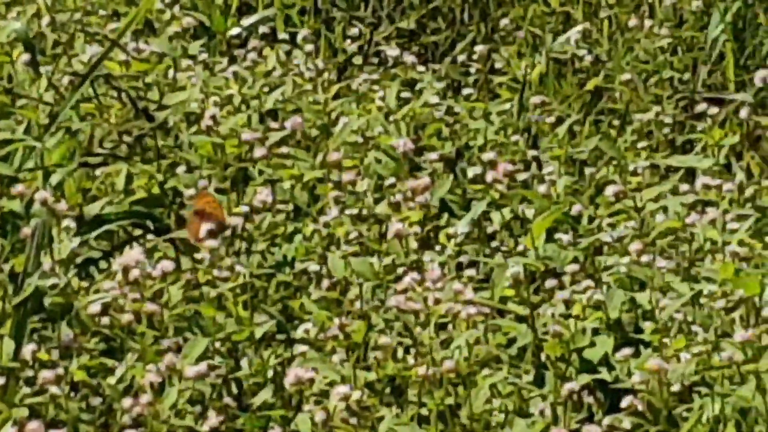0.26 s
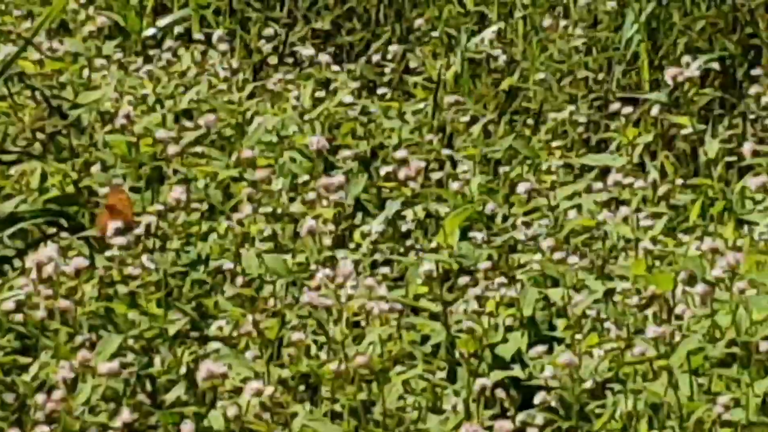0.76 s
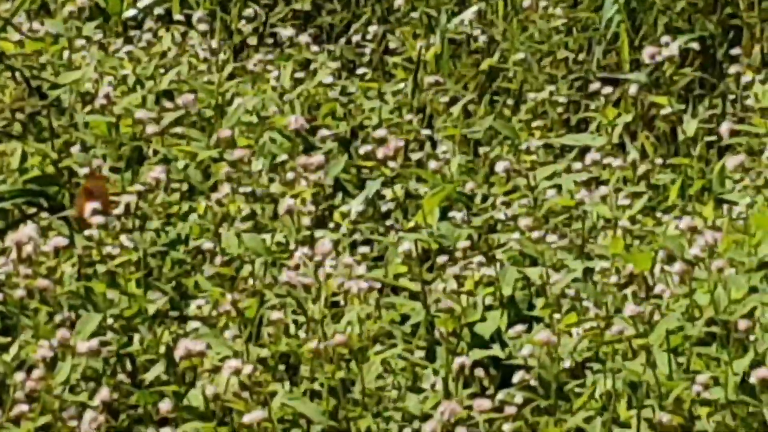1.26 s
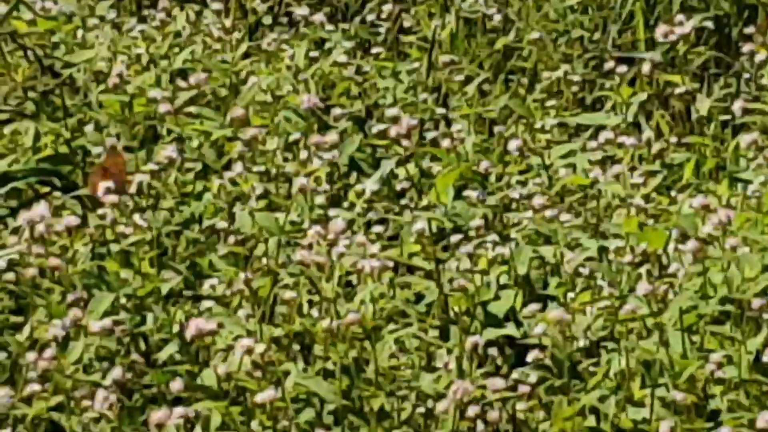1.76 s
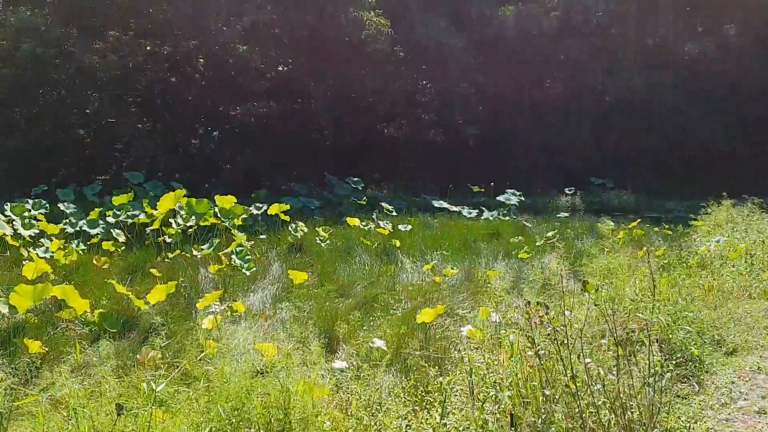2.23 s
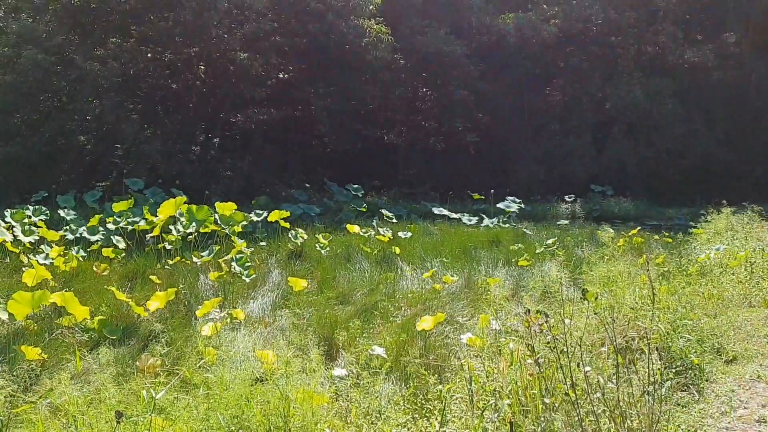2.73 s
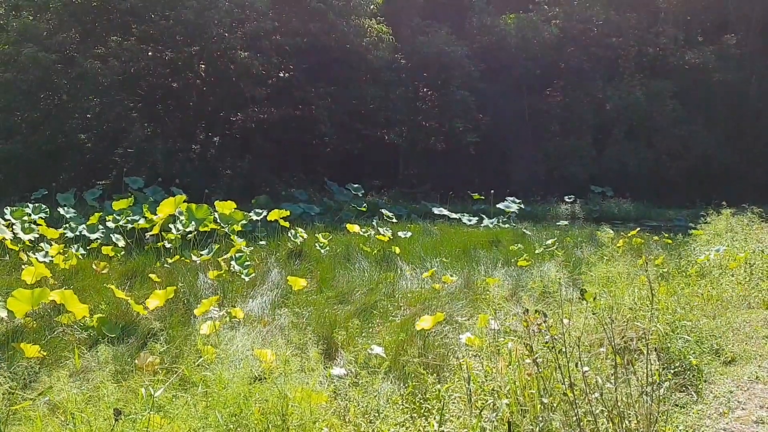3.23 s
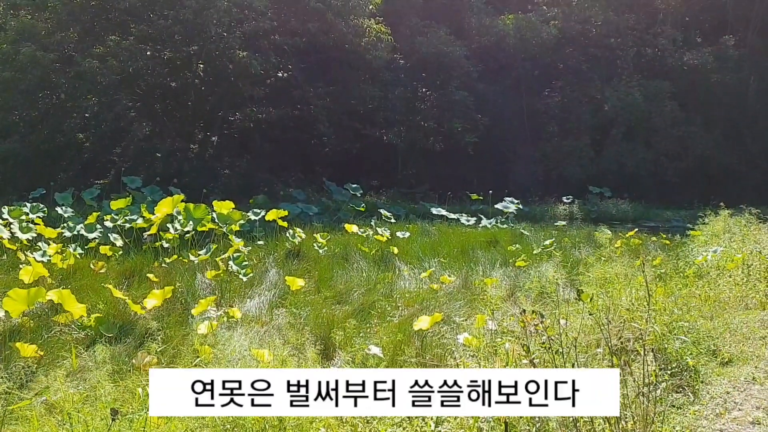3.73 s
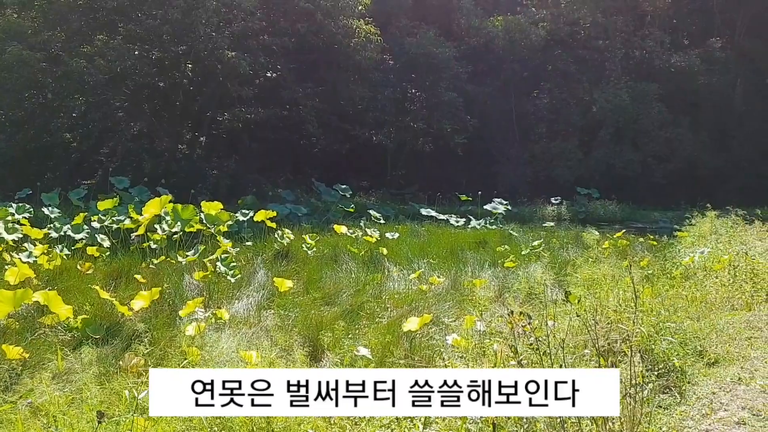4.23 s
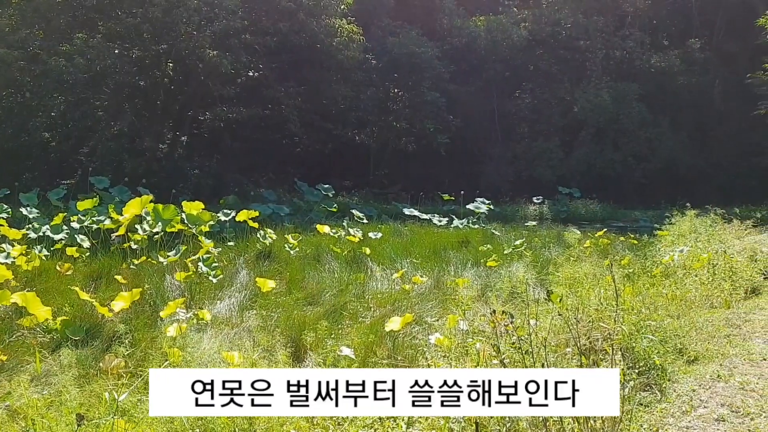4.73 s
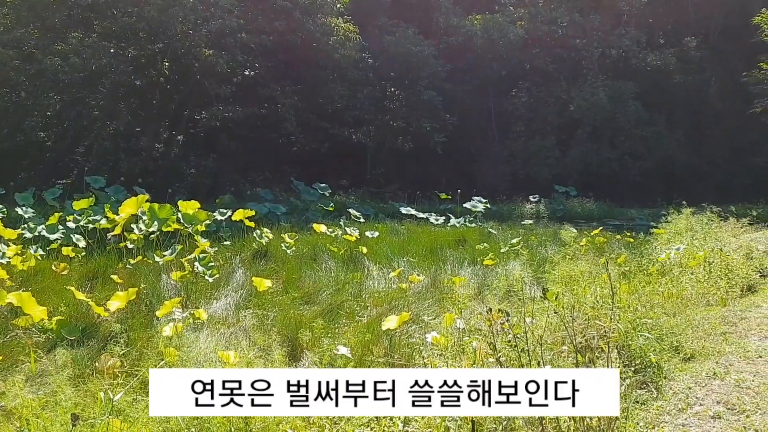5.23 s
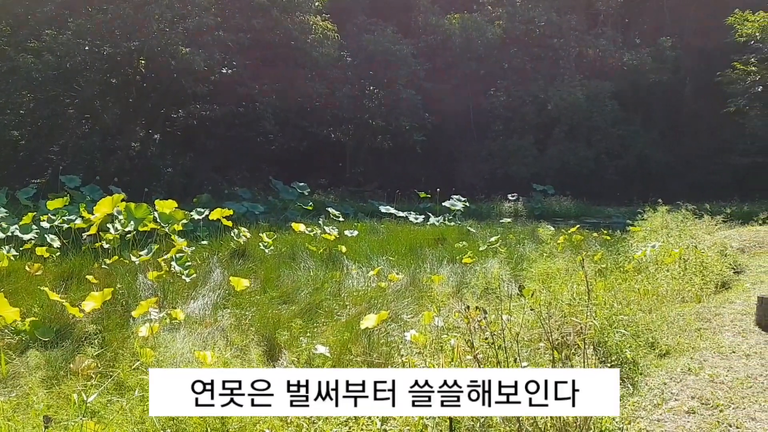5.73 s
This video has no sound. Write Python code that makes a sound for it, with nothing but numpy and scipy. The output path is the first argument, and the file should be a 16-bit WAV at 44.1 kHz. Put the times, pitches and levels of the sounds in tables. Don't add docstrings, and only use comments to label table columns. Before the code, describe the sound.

Outdoor stereo insect ambience, with no handling sounds or water. From 0 to 0.3 s a near cicada's crisp high buzz is already sounding; a nasal whine around 4 kHz swells to about 0.5 s, the buzz returns until 0.9, a second whine lasts to 1.1, and a last rougher buzz runs to 1.5. It then sinks into a grainy, uneven drone, surging at 1.55 and again at 2.2 before fading by 2.7, with a slight echo from plants. At about 2.77 s the background switches abruptly: a steady, shimmering choir of pond cicadas, strongly left, holds to the end at 6 s, dipping near 5.7 and rising last. Throughout, a katydid gives tiny dry chirps of several strokes at 12-14 kHz, roughly every 0.23 s; a quicker, quieter one interleaves, left then right. Broad far-insect hiss and light, lumpy wind rumble, with gusts near 0.1, 1.1, 3.2, and 4.1 s.

```python
import sys
import numpy as np
from scipy import signal
from scipy.fft import rfft, irfft
from scipy.io import wavfile
from scipy.ndimage import uniform_filter1d

SR = 44100
rng = np.random.default_rng(int(sys.argv[2]) if len(sys.argv) > 2 else 0)


def linear_from_db(decibels):
    return 10 ** (np.asarray(decibels, float) / 20)


def store_pcm(level_fs):
    pcm = np.round(np.clip(level_fs, -1, 1) * 32767).astype(np.int16)
    wavfile.write(sys.argv[1], SR, np.atleast_2d(pcm).T)


N = 263718
CUT_S = 2.768

# (start [s], release [s], top level [dB], roughness [0-1])
BUZZ = [
    (-.2, 0.27, -44, .12),
    (.5, 0.923, -45, 0.4),
    (1.127, 1.505, -45.5, 0.6),
]
# (at start [Hz], at end [Hz])
BUZZ_HZ = [
    (168.2, 168.8),
    (167.5, 167.8),
    (167.8, 163.8),
]
# (frequency [Hz], level [dB])
BUZZ_COLOUR = [(5880, -48), (10000, -13), (11000, -18.5), (11500, -7), (13100, -1.5), (15100, -2),
               (15800, -7), (16000, -11)]
BUZZ_PANS_DB = (0, 2.5, 1.5)
BUZZ_RISE_S, BUZZ_START_DB, BUZZ_SWELL_S, BUZZ_SWELL_DB = 0.045, -12, 0.11, -2
BUZZ_DROP_S, BUZZ_DROP_DB, BUZZ_END_S, BUZZ_END_DB = 0.058, -7.5, 0.086, -11

# (start [s], air sac opens [s], release [s], top level [dB], sac resonance at release [Hz])
WHINE = [
    (0.235, 0.329, 0.5, -42.5, 4560),
    (0.856, 0.948, 1.124, -43, 4330),
]
# (frequency [Hz], level [dB])
OVERTONES = [
    [(3263, -66), (3607, -63), (3435, -54), (3779, -50), (3957, -58), (4124, -52), (4301, -54), (4468, -53),
     (4640, -54), (4813, -53), (4990, -54), (5157, -56), (5496, -60), (5674, -63), (6013, -59), (6191, -55),
     (6358, -60), (6535, -58)],
    [(3086, -65), (3257, -64), (3600, -64), (3429, -53), (5150, -56), (3768, -48), (3941, -61), (4118, -53),
     (4285, -55), (4457, -51), (4630, -53), (4797, -55), (4980, -53), (5486, -61), (5825, -60), (6169, -60),
     (6514, -55), (6686, -62)],
]
# (time [s], level [dB])
MURMUR = [
    (0, -63),
    (.06, -55),
    (.12, -61),
]
MURMUR_HZ, MURMUR_ROUGH = 172, 0.5
LEAD_DB, READY_DB, OPENED_DB, SINK_DB, RELEASE_DB = -14.5, -6.5, -3, -1.5, -3
OPEN_S, SINK_S, CREST_S = 0.03, 0.135, 0.05
DROP_S, DROP_DB, TAIL_S, TAIL_DB = 0.039, -8, 0.14, -18
SHUT_HZ, HELD_HZ, SLACK_HZ, EMPTY_HZ = 5040, 4430, 3800, 3400
SHUT_DB, OPEN_DB, EMPTY_DB = -8, 0, -1.5
TOP_HZ, SAG_HZ_PER_DB, TIRE_HZ = 171.9, 0.2, 1.0
CLEAN, ROUGH_PER_DB, WHINE_PAN_DB, SLACK_PAN_DB = 0.05, 0.007, 2.4, 6

# (time [s], effort [dB], rib clicks [Hz], sac resonance [Hz], sac strength [dB])
DRONE = [
    [(1.505, -60, 165, 4500, -8), (1.535, -47.5, 166, 4450, -8), (1.6, -45.5, 163.5, 4570, -3),
     (1.695, -46.3, 162.5, 4535, -2), (1.775, -49, 154, 4310, 0), (1.8, -51.5, 164.5, 4450, -1),
     (1.84, -50, 164, 4430, 0), (1.885, -49.5, 161, 4350, 0), (1.93, -53, 162, 4370, -3),
     (1.98, -51.5, 163, 4400, -2), (2.05, -51, 160, 4320, -1), (2.09, -52.5, 161, 4350, -2),
     (2.13, -50.5, 163.5, 4410, 0)],
    [(2.16, -51, 165, 4480, -5), (2.195, -46, 170.5, 4640, -11), (2.25, -46.5, 170, 4430, -12),
     (2.31, -47.5, 169.4, 4420, -11), (2.35, -52, 168.3, 4380, 0), (2.41, -53, 173, 4420, -2),
     (2.455, -50.5, 174, 4720, 0), (2.54, -53, 174, 4660, -3), (2.62, -57, 176, 4420, 0),
     (2.76, -57, 176, 4420, 0)],
]
# (frequency [Hz], width [Hz], level [dB])
SIDE_MODES = [(3170, 120, -23), (6240, 360, -16)]
# (frequency [Hz], width [Hz])
RIBS = [(3690, 260), (3940, 180), (5040, 270), (3300, 650)]
RIBS_DB = (-11, -11, -11, -14)
RIBS_FOLLOW = (-.3, .45, 1.9, 0)
# (rib number, time [s], half length [s], lift [dB])
OUTBURSTS = [
    (0, 1.55, .05, 7),
    (3, 1.54, .035, 7),
    (0, 1.755, .03, 5),
    (3, 1.75, .03, 5),
    (0, 1.93, .04, 4),
    (0, 2.02, .05, 8),
    (1, 2.16, .03, 10),
    (0, 2.18, .025, 5),
    (1, 2.48, .07, 15),
]
SAC_WIDTH_HZ, REST_DB, DRONE_PAN_DB = 200, -49, 3
DRONE_ROUGH, FIRST_ROUGH, FIRST_RIB_S = 0.5, 0.45, 0.035
ECHO_DB, ECHO_T60_S = -13, 0.3

# (time [s], level [dB])
CHOIR = [
    (2.77, -41.5),
    (3.5, -43),
    (4.3, -43),
    (5.1, -43.5),
    (5.45, -42.5),
    (5.72, -45),
    (5.98, -40),
]
# (frequency [Hz], width [Hz], level [dB])
SINGERS = [(3677, 48, -6), (3980, 27, -16), (4315, 28, -8.5), (4580, 45, -3), (4710, 31, -8),
           (4887, 80, -1), (5205, 50, -6.5), (5360, 55, -13), (5895, 80, -6), (6170, 105, -2.5),
           (6350, 87, -6.5), (6590, 48, -5.5), (7130, 130, -3.5), (7650, 720, -4)]

# (first full stroke [s], last stroke [s], level [dB])
NEAR = [(.062, .139, -46), (.292, .373, -44), (.54, .617, -50), (.75, .83, -44), (.979, 1.055, -43),
        (1.21, 1.29, -42.5), (1.44, 1.52, -46), (1.674, 1.768, -43.5), (1.907, 2.002, -44.5),
        (2.136, 2.214, -42.5), (2.356, 2.434, -43), (2.594, 2.689, -43), (2.84, 2.932, -43.5),
        (3.067, 3.16, -41.5), (3.29, 3.383, -42), (3.514, 3.609, -42.5), (3.737, 3.851, -42.5),
        (3.978, 4.092, -43.5), (4.223, 4.319, -40.5), (4.456, 4.554, -41.5), (4.697, 4.792, -41.5),
        (4.931, 5.024, -41.5), (5.174, 5.269, -40.5), (5.405, 5.501, -43), (5.623, 5.738, -42),
        (5.863, 5.958, -42.5)]
# (first full stroke [s], last stroke [s], level [dB])
QUICK = [(.405, .459, -49), (1.55, 1.603, -58), (1.757, 1.812, -50), (2.05, 2.117, -56), (2.265, 2.33, -53),
         (2.462, 2.524, -51.5), (2.677, 2.731, -51), (2.905, 2.96, -46.5), (3.125, 3.178, -54),
         (3.46, 3.53, -49.5), (3.63, 3.695, -50), (3.847, 3.914, -48), (4.058, 4.125, -46),
         (4.27, 4.335, -48), (4.474, 4.528, -49), (4.622, 4.69, -50.5), (4.821, 4.888, -49),
         (5.029, 5.096, -48.5), (5.24, 5.307, -50), (5.48, 5.547, -49), (5.7, 5.766, -49.5),
         (5.92, 5.975, -49)]
# (frequency [Hz], level [dB])
WING_MEADOW = [(5880, -17), (10000, -20), (10500, -19), (11600, -5), (12100, -10), (13000, 2), (13700, 1),
               (14500, -4), (15400, -13), (16000, -12)]
# (frequency [Hz], level [dB])
WING_POND = [(5290, -39), (9000, -17), (12200, -2), (13300, 5), (14100, 4), (15100, -5), (16000, -10)]
# (frequency [Hz], level [dB])
WING_TURNED = [(5290, -40), (9000, -20), (11500, -5.5), (12700, 5.5), (13300, 10), (14200, -4), (15200, -3),
               (16000, 2)]
HIDDEN_DB = -3

# (frequency [Hz], level [dB per Hz])
MEADOW = [(210, -21), (350, -13.5), (575, -11.5), (895, -3.5), (1100, -14), (1230, -9), (1450, -7),
          (1620, -10), (3420, -1), (3820, -2), (3980, 2), (6020, 0.5), (9500, -16), (12400, -60),
          (20900, -120)]
# (frequency [Hz], level [dB per Hz])
POND = [(210, -40), (350, -18), (488, -25.5), (623, -16), (832, -14), (1180, -21), (1420, -16.5),
        (2490, -16), (3200, -10), (3570, -7), (4760, -2.5), (5500, -6.5), (6090, -3.5), (8480, -15),
        (11000, -18), (14300, -28), (22000, -120)]
# (frequency [Hz], level [dB per Hz])
MEADOW_TOP = [(5290, -55), (9000, 1.5), (12000, 5), (12800, 3.5), (15000, 7), (16000, -12)]
# (frequency [Hz], level [dB per Hz])
POND_TOP = [(6180, -30), (10500, -12), (13900, -8.5), (14800, -14), (15000, -24), (15900, -28),
            (16000, -44)]
MEADOW_DB, POND_DB, MEADOW_TOP_DB, POND_TOP_DB = -50, -47, -56, -57.5
# (frequency [Hz], left over right [dB])
SIDE_DB = [(60, 2.0), (180, 7), (550, 4), (1650, 3), (4970, 3.5), (15000, 5)]

# (frequency [Hz], level [dB per Hz])
RUMBLE = [(8.8, -40), (15, -29), (49, 1.5), (95, -5), (120, -23), (210, -120)]
# (frequency [Hz], level [dB per Hz])
BODY = [(50, -38), (85, -4), (119, 4.5), (177, -5.5), (263, -2), (450, -22), (580, -46), (990, -120)]
# (time [s], strength [dB], depth [0 body - 1 rumble])
GUSTS = [(.09, 7.5, 0.97), (.39, 4, 0.7), (.88, 3.5, 0.96), (1.1, 6, 1), (1.21, 2.5, .4), (1.45, 5, 0.96),
         (1.62, 1.5, .3), (2.02, 4, 0.61), (2.3, 2, 0.79), (2.7, 4, 0.16), (2.98, 2, .05),
         (3.17, 7.5, 0.94), (4.0, 4, .1), (4.14, 11, 0.7), (4.65, 4, .2), (4.81, 5, .05), (5.38, 2.5, .05),
         (5.9, 4.5, 1)]
RUMBLE_CALM_DB, BODY_CALM_DB, GUST_S = -64, -61, 0.067
POND_RUMBLE_DB = -3


def cicada():
    out = np.zeros((2, N))
    for song in (buzz, whine, drone):
        song(out)
    t = np.arange(0, ECHO_T60_S, 1 / SR)
    echo = rng.standard_normal((2, len(t))) * linear_from_db(-60 * t / ECHO_T60_S) * (t > 0.004)
    wet = signal.fftconvolve(out, echo / np.linalg.norm(echo[0]), axes=1)[:, :N]
    return (out + linear_from_db(ECHO_DB) * wet) / np.sqrt(1 + linear_from_db(2 * ECHO_DB))


def buzz(out):
    def colour(k, hz):
        return linear_from_db(read(BUZZ_COLOUR, k * 169.6))

    for phrase, cycles_hz in zip(BUZZ, BUZZ_HZ):
        rows = buzz_rows(*phrase, *cycles_hz)
        add(out, *tymbal(rows, range(62, 95), colour, drift_s=0.11, spread=1.36, wander=1.6))


def buzz_rows(start, release, top_db, rough, start_hz, end_hz):
    risen = start + BUZZ_RISE_S
    s = np.array([start, risen, risen + BUZZ_SWELL_S, release, release + BUZZ_DROP_S, release + BUZZ_END_S])
    under = [BUZZ_START_DB, BUZZ_SWELL_DB, BUZZ_SWELL_DB / 2, 0, BUZZ_DROP_DB, BUZZ_END_DB]
    db = top_db + np.array(under)
    heard = np.maximum(s, 0)
    hz = np.interp(heard, heard[[0, -1]], [start_hz, end_hz])
    pan_db = np.interp(heard, heard[[0, 3, 5]], BUZZ_PANS_DB)
    return np.transpose([heard, np.interp(heard, s, db), hz, np.full(len(s), rough), pan_db])


def whine(out):
    murmur = [(s, db, MURMUR_HZ, MURMUR_ROUGH, WHINE_PAN_DB, HELD_HZ, SHUT_DB) for s, db in MURMUR]
    swells = [murmur] + [whine_rows(*swell) for swell in WHINE]
    for rows, lines in zip(swells, OVERTONES[:1] + OVERTONES):
        strength = {round(hz / 172): db for hz, db in sorted(lines, key=lambda line: line[1])}

        def colour(k, hz, sac_hz, body_db):
            near_sac = mode(hz, sac_hz, 400)
            above = np.clip((hz - sac_hz - 60) / 230, 0, 1) * (hz < 5300)
            under = mode(hz, 4600, 520) * np.clip((sac_hz - 4900) / 140, 0, 1)
            lift = 1.6 * body_db * (1 - near_sac) + 3 * near_sac
            return linear_from_db(strength[k] + lift - 15 * above - 13 * under - 5 * (hz > 5300))

        add(out, *tymbal(rows, strength, colour, drift_s=0.06, spread=1.0, wander=0.46, apart=0.35))


def whine_rows(start, opens, release, top_db, held_hz):
    s = np.array([start, opens - OPEN_S, opens, release - SINK_S, release - CREST_S,
                  release, release + DROP_S, release + TAIL_S])
    under = np.array([LEAD_DB, READY_DB, OPENED_DB, SINK_DB, 0, RELEASE_DB, DROP_DB, TAIL_DB])
    hz = TOP_HZ + SAG_HZ_PER_DB * under / 2 - TIRE_HZ * (s >= release)
    rough = CLEAN + ROUGH_PER_DB * under ** 2
    pan_db = np.where(under == DROP_DB, SLACK_PAN_DB, WHINE_PAN_DB)
    sac_hz = np.interp(s, s[[2, 3, 5, 6, 7]], [SHUT_HZ, SHUT_HZ - 100, held_hz, SLACK_HZ, EMPTY_HZ])
    body_db = [SHUT_DB] * 2 + [OPEN_DB] * 5 + [EMPTY_DB]
    return np.transpose([s, top_db + under, hz, rough, pan_db, sac_hz, body_db])


def drone(out):
    def colour(k, hz, sac_hz, sac_db, *ribs_db):
        body = linear_from_db(sac_db) * mode(hz, sac_hz, SAC_WIDTH_HZ)
        body = body + sum(linear_from_db(db) * mode(hz, f, width) for f, width, db in SIDE_MODES)
        ribs = sum(linear_from_db(1.97 * (db + 4.0)) * mode(hz, f, width) for (f, width), db in zip(RIBS, ribs_db))
        return body + ribs

    add(out, *tymbal(drone_rows(), range(18, 39), colour, drift_s=0.04, spread=0.91, wander=0.9, apart=0.6))


def drone_rows():
    s, db, hz, sac_hz, sac_db = np.transpose(sum(DRONE, []))
    effort = np.maximum(db - REST_DB, REST_DB / 10)
    first = np.exp(-((s - s[0]) / FIRST_RIB_S / 2) ** 2)
    ribs_db = np.array([rest_db + follow * effort for rest_db, follow in zip(RIBS_DB, RIBS_FOLLOW)])
    for rib, at_s, half_s, lift_db in OUTBURSTS:
        ribs_db[rib] += lift_db * np.exp(-((s - at_s) / half_s) ** 2)
    rough = DRONE_ROUGH + FIRST_ROUGH * first
    return np.transpose([s, db, hz, rough, DRONE_PAN_DB + 0 * s, sac_hz, sac_db, *ribs_db])


def tymbal(rows, orders, colour, drift_s, spread, wander, apart=1.0):
    s, *columns = np.transpose(rows)
    t = np.arange(s[0], s[-1], 1 / SR)
    samples = np.arange(len(t))
    db, hz, rough, pan_db, *controls = (np.interp(t, s, c) for c in columns)
    turns = np.cumsum(hz) / SR
    rough = np.clip(rough, 0, 1)
    knots = np.arange(len(t) // 128 + 2) * 128
    out = np.zeros((2, len(t)))
    for k in orders:
        z = rng.standard_normal((len(knots), 4, 2)) @ [1, 1j]
        start = np.exp(1j * spread * (rng.standard_normal() + apart * rng.standard_normal(2)))
        drift = evened(uniform_filter1d(z[:, :2], int(drift_s * SR / 128) + 1, axis=0))
        slow = start + wander * drift
        spin = colour(k, k * hz, *controls) * np.exp(2j * np.pi * k * turns)
        for ear in range(2):
            held = np.interp(samples, knots, slow[:, ear])
            fresh = np.interp(samples, knots, z[:, 2 + ear])
            out[ear] += ((np.sqrt(1 - rough) * held + np.sqrt(rough) * fresh) * spin).real
    power = uniform_filter1d((out ** 2).mean(0), size=1500)
    fade = np.clip(np.minimum(t - s[0] + (s[0] == 0), s[-1] - t) / 0.0038, 0, 1)
    return s[0], out / np.sqrt(power) * linear_from_db(db + 4) * panned(pan_db) * fade


def choir():
    s, db = np.transpose(CHOIR)
    t = np.arange(s[0], s[-1], 1 / SR)
    slow_t = t[::441]
    out, sound = np.zeros((2, N)), np.zeros((2, len(t)))
    for hz, width_hz, level_db in SINGERS:
        drifts = rng.standard_normal((2, len(slow_t)))
        waver, throb = (np.interp(t, slow_t, evened(uniform_filter1d(v, size=6))) for v in drifts)
        clicks = rng.standard_normal((2, len(t))) * (rng.random(len(t)) < 2500 / SR)
        turn = np.exp(2j * np.pi * np.cumsum(hz + 15 * waver) / SR)
        r = np.exp(-np.pi * width_hz / SR)
        ring = signal.lfilter([1], np.convolve([1, -r], [1, -r]), clicks / turn)
        sound += linear_from_db(level_db + 0.53 * throb) * evened((ring * turn).real)
    add(out, s[0], evened(sound) * linear_from_db(np.interp(t, s, db) - 6.5) * panned(13.9)[:, None])
    return out


def katydid(chirps, stroke_s, teeth_hz, pans_db, lag_s, echo_db):
    effort = wing_strokes(chirps, stroke_s)
    jitter = evened(uniform_filter1d(rng.standard_normal(N), size=60))
    turns = np.cumsum(teeth_hz * (1 + 0.25 * jitter)) / SR
    teeth = np.diff(np.floor(turns), prepend=0) * rng.normal(1, 0.24, N) * rng.choice([-1, 1], N)
    scrape = evened(teeth) * effort[0]

    hz, after = np.fft.rfftfreq(512, 1 / SR), np.arange(N) > CUT_S * SR
    glide = np.exp(-1j * np.pi * (hz - 13800) ** 2 * 0.0009 / 1000)
    wings = (WING_MEADOW, WING_POND, WING_TURNED)
    rings = [np.roll(irfft(linear_from_db(read(wing, hz)) * glide), len(hz)) for wing in wings]
    meadow, pond, turned = (signal.oaconvolve(scrape, r / np.linalg.norm(r), "same") for r in rings)
    turn = np.clip((np.arange(N) / SR - 3.5) / 2.0, 0, 1)
    direct = np.where(after, (1 - turn) * pond + turn * turned, meadow)

    grass = rng.standard_normal((2, 3000)) * linear_from_db(-60 * np.arange(3000) / SR / 0.051)
    wet = signal.oaconvolve(direct[None], grass / np.linalg.norm(grass[0]), axes=1)[:, :N]
    early, late = (np.roll(direct, round(lag * SR)) for lag in lag_s)
    pair = np.array([direct, np.where(after, late, early)])
    pair = pair * linear_from_db(np.where(after, 0, HIDDEN_DB)) * panned(np.where(after, pans_db[1], pans_db[0]))
    return pair + linear_from_db(np.where(after, echo_db[1], echo_db[0])) * wet


def wing_strokes(chirps, stroke_s):
    effort = np.zeros((1, N))
    t = np.arange(-0.7 * stroke_s, 0.6 * stroke_s, 1 / SR)
    stroke = np.exp(-(t / np.where(t < 0, 0.32 * stroke_s, 0.25 * stroke_s)) ** 2)
    for first, last, db in chirps:
        strokes = round((last - first) / stroke_s)
        for k in range(-1, strokes + 1):
            weak_db = {-1: -13, 0: -3.5}.get(k, rng.normal(0, 1.2))
            at_s = first + (last - first) * k / strokes
            add(effort, at_s + t[0], linear_from_db(db + weak_db) * stroke[None])
    return effort


def distance():
    meadow = linear_from_db(MEADOW_DB + 3) * hiss(MEADOW, 0.023, 0.00024, patchy_db=1.5)
    meadow = meadow + linear_from_db(MEADOW_TOP_DB) * hiss(MEADOW_TOP, 0.12, 0, patchy_db=0.88)
    pond = linear_from_db(POND_DB + 4) * hiss(POND, 0.056, 0.00006, patchy_db=1.5)
    pond = pond + linear_from_db(POND_TOP_DB) * hiss(POND_TOP, 0.17, 0, patchy_db=1)
    both = np.where(np.arange(N) > CUT_S * SR, pond, meadow)
    hz = np.fft.rfftfreq(N, 1 / SR)
    f, db = np.transpose(SIDE_DB)
    return irfft(rfft(both) * panned(np.interp(hz, f, db)), N)


def wind():
    t = np.arange(N) / SR
    rumble_db, body_db = RUMBLE_CALM_DB, BODY_CALM_DB
    for s, db, depth in GUSTS:
        lift = db * np.exp(-((t - s) / GUST_S) ** 2)
        rumble_db = rumble_db + lift * np.sqrt(np.clip(depth, 0, 1))
        body_db = body_db + lift * np.sqrt(np.clip(1 - depth, 0, 1))
    rumble_db = rumble_db + POND_RUMBLE_DB * (t > CUT_S)
    rumble = linear_from_db(rumble_db) * hiss(RUMBLE, 0.018, 0.0001, patchy_db=1.0, size=4096) * panned(1.8)[:, None]
    body = linear_from_db(body_db) * hiss(BODY, 0.094, 0.0001, patchy_db=1.5, size=2048) * panned(2.4)[:, None]
    return rumble + body


def hiss(colour, same, lag_s, patchy_db, size=1024):
    frames, hz = 4 * N // size + 5, np.fft.rfftfreq(size, 1 / SR)
    a, b, c, d, patches = rng.standard_normal((frames, len(hz), 5)).T
    patches = uniform_filter1d(uniform_filter1d(patches, size=5, axis=0), size=12, axis=1)
    same = np.clip(same + 0.87 * mode(hz, 0, 3000) ** 3, 0, 1)[:, None]
    left = a + 1j * b
    late = left * np.exp(-2j * np.pi * hz * lag_s)[:, None]
    z = np.array([left, same * late + np.sqrt(1 - same ** 2) * (c + 1j * d)])
    z *= linear_from_db(read(colour, hz)[:, None] + patchy_db * evened(patches))
    return evened(signal.istft(z, nperseg=size, noverlap=3 * size // 4)[1][:, :N])


def mode(hz, centre_hz, width_hz):
    return 1 / (1 + (2 * (hz - centre_hz) / width_hz) ** 2)


def read(points, hz):
    f, value = np.transpose(points)
    return np.interp(np.log(hz + 1), np.log(f + 1), value, -99, -99)


def evened(x):
    return x / np.sqrt(np.mean(abs(x) ** 2) + 1e-20)


def panned(db):
    return linear_from_db(np.array([db / 2, -db / 2]))


def add(mix, s, sound):
    part = mix[:, max(round(s * SR), 0):][:, :sound.shape[1]]
    part += sound[:, :part.shape[1]]


def scene():
    near = katydid(NEAR, 0.018, 1500, pans_db=(-3, 2.5), lag_s=(-0.0004, -0.0002), echo_db=(1.5, 1.2))
    quick = katydid(QUICK, 0.016, 1800, pans_db=(6, -11), lag_s=(0.0004, -0.0004), echo_db=(1.5, 1.2))
    return cicada() + choir() + near + quick + distance() + wind()


def top_cut(x):
    return signal.sosfilt(signal.butter(12, 15900, fs=SR, output="sos"), x)


def record(dry):
    edge = signal.firwin(511, 15900, window=("kaiser", 9), fs=SR)
    mix = signal.oaconvolve(dry, edge[None], "same", axes=1)
    return top_cut(mix)


dry = scene()
out = record(dry)
store_pcm(out)
```